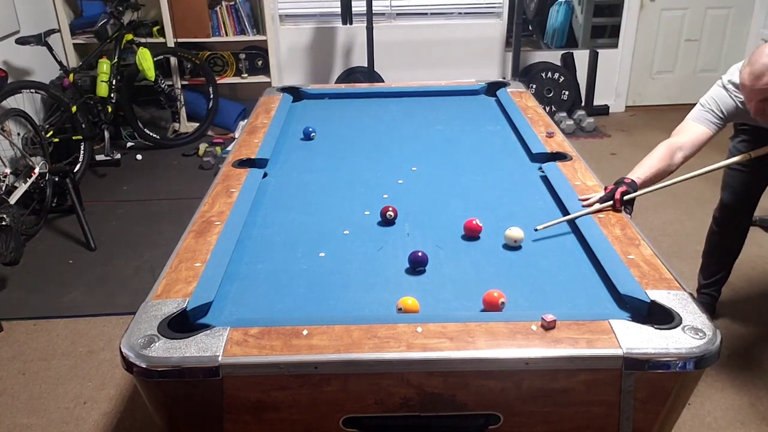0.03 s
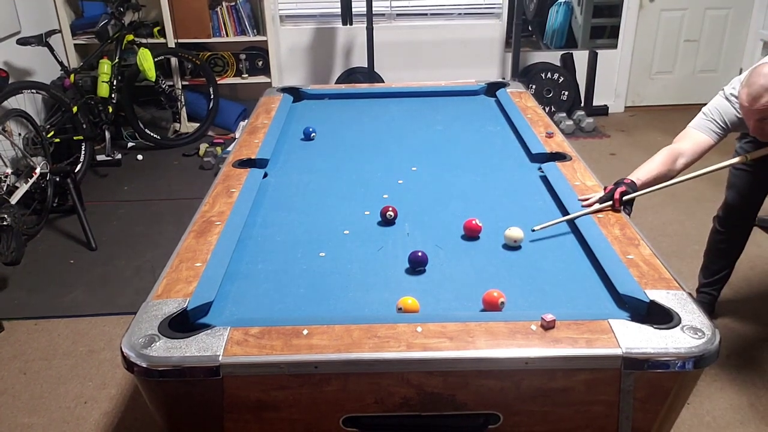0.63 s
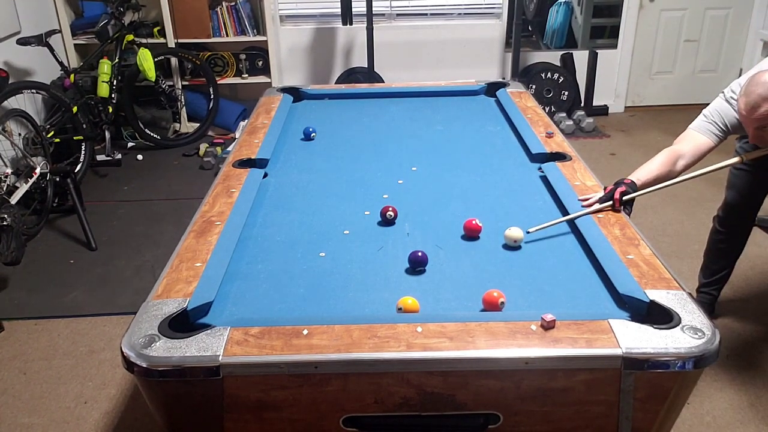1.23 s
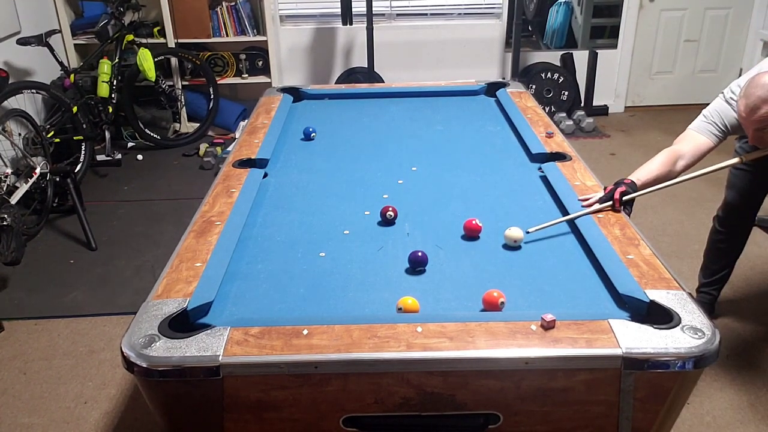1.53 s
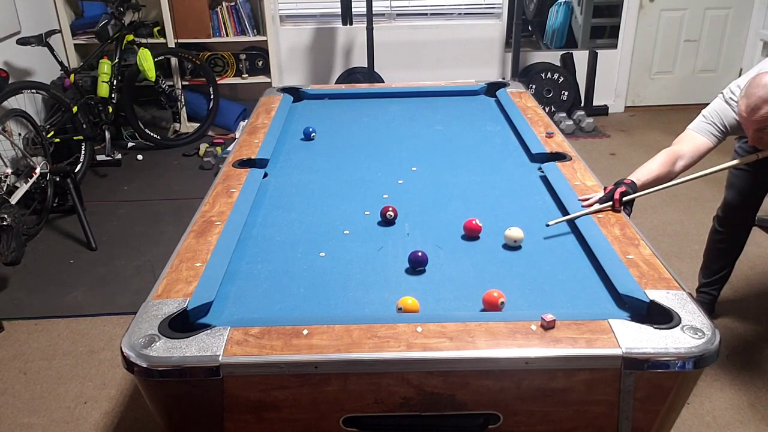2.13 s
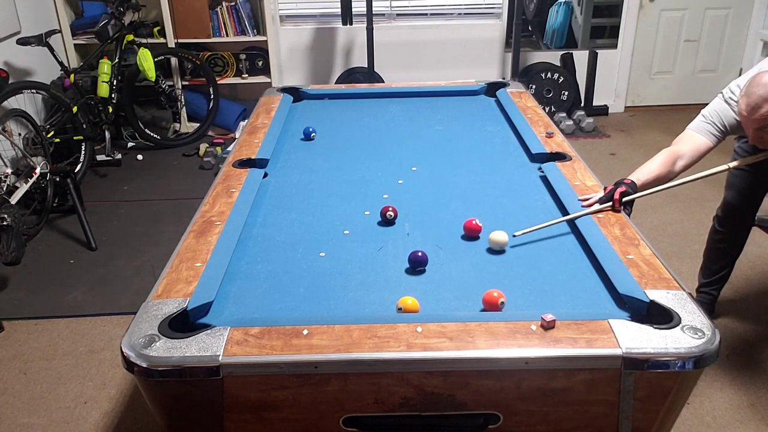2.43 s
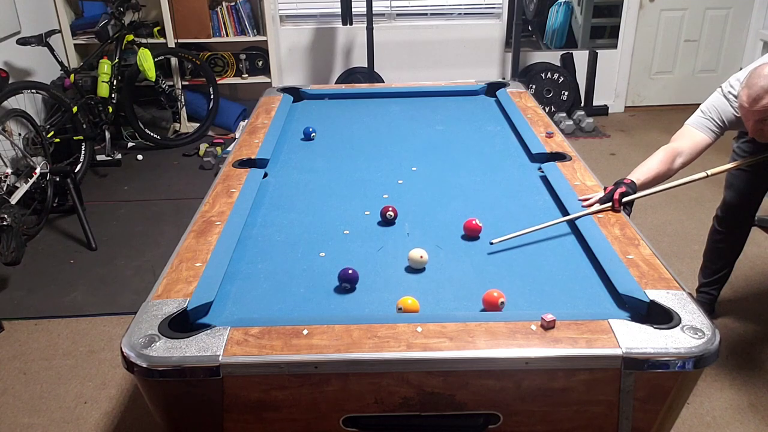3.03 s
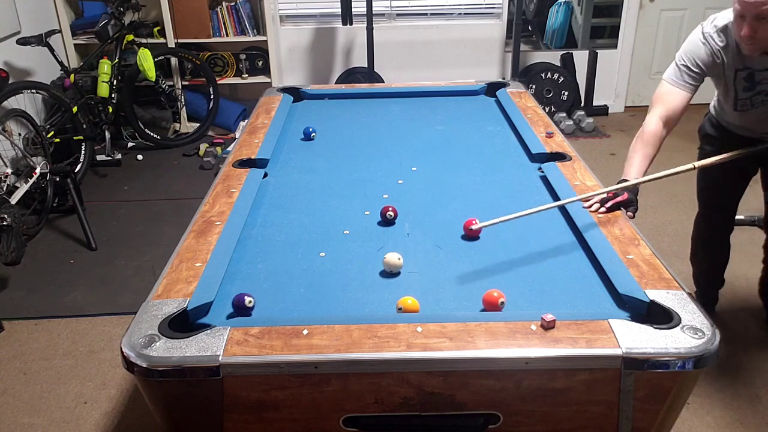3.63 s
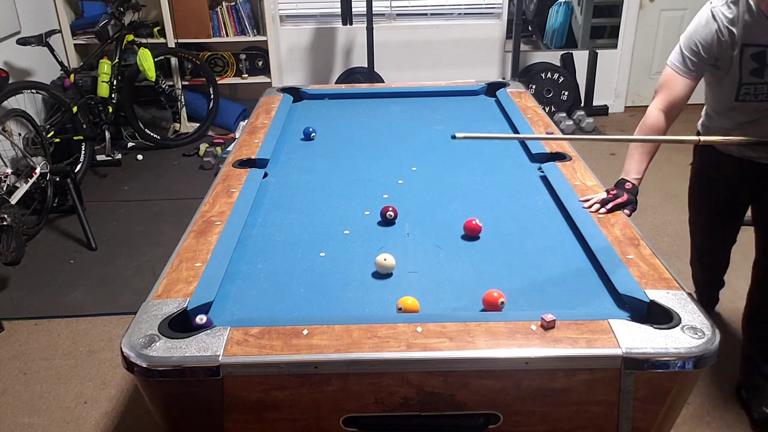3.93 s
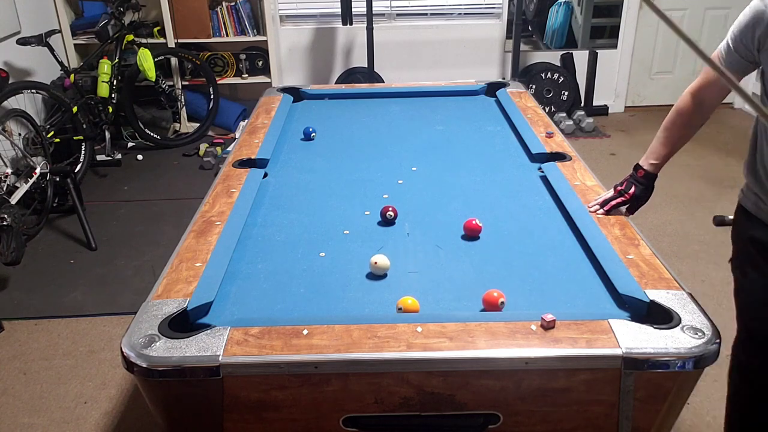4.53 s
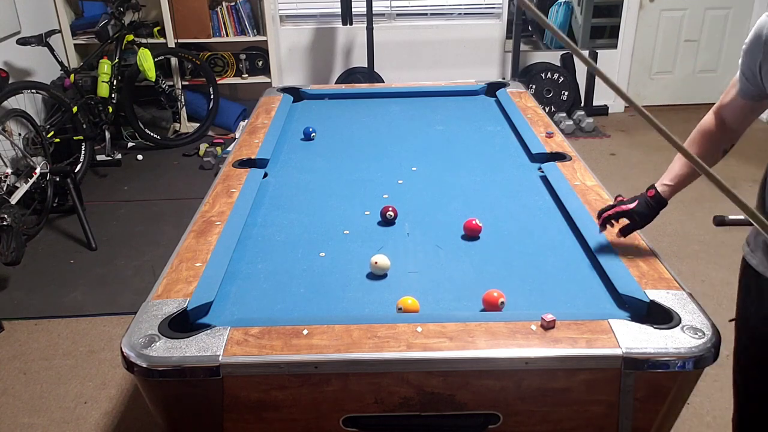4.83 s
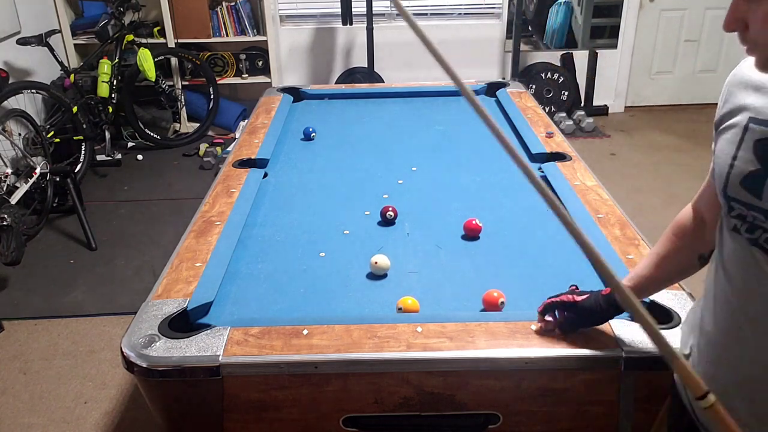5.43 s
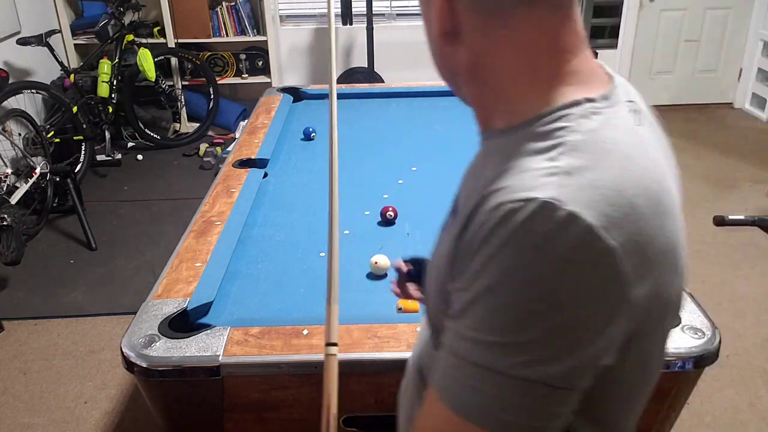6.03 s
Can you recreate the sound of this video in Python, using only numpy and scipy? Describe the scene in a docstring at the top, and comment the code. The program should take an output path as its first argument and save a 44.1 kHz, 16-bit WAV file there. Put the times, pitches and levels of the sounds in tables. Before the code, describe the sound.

Dull thumps, then a pool shot: balls click, roll, and one clatters into a pocket and trundles down a wooden channel.

```python
"""A pool shot in a hard-walled garage, over a faint hum and hiss. First, dull woody thumps boom out of
sight and a faint rumble follows. The cue taps the white ball, which clicks against another; the balls
rumble, hop and bump over the slate. One bumps the rubber jaw of a corner pocket and clatters in, ringing
the cabinet. A soft, airy hiss swells and sinks, the ball trundles down the wooden return channel, and a
fainter, thin rustle follows."""
import sys
import numpy as np
from scipy import signal
from scipy.fft import rfft, irfft, next_fast_len
from scipy.io import wavfile
from scipy.ndimage import map_coordinates

SR = 44100
rng = np.random.default_rng(int(sys.argv[2]) if len(sys.argv) > 2 else 0)


def master(y):
    """Save y as 16-bit WAV."""
    cut = np.clip(np.atleast_2d(y).T, -1, 1)
    pcm = np.round(cut * 32767)  # scale
    wavfile.write(sys.argv[1], SR, pcm.astype(np.int16))


N = 276948
T = np.arange(SR) / SR  # the one-second life of a blow

# colour of a ball rolling on slate, and of the far rumble: f/Hz, level/dB
ROLL_TONE = [(40, -29), (80, -5), (170, -8.5), (245, 0), (350, -9), (520, -18.5), (800, -33.5),
             (2000, -39.5), (6000, -85.5)]


def amp(db):
    """Decibels to gain."""
    return 10 ** (np.asarray(db) / 20)


def unit(x):
    """Scale to rms 1."""
    return x / np.sqrt(np.mean(x ** 2) + 1e-20)


def along(points, hz):
    """Read a curve of (f/Hz, value) points on a log frequency axis."""
    f, values = np.transpose(points)
    return np.interp(np.log(hz + 1), np.log(f + 1), values)


def wobble(rate):
    """A smooth random curve with `rate` knots a second."""
    knots = rng.standard_normal(int(N * rate / SR) + 4)
    return map_coordinates(knots, [np.arange(N) * rate / SR])


def envelope(start, length, rise_s, fall_db_per_s, fade_db_per_s=0):
    """A linear rise, a hold that may slowly fade, and a release."""
    t = np.maximum(np.arange(N) / SR - start, 0)
    return np.minimum(t / rise_s, 1) * amp(-fade_db_per_s * t - fall_db_per_s * np.maximum(t - length, 0))


def filtered(x, response):
    """Zero-phase EQ; `response` gives the gain at each frequency."""
    n = x.shape[-1]
    padded = next_fast_len(n + 8192)
    return irfft(rfft(x, padded) * response(np.fft.rfftfreq(padded, 1 / SR)), padded)[..., :n]


def add(track, s, db, sound):
    """Lay a blow on the track; db is its level with all its energy packed into 60 ms."""
    start = round(s * SR)
    part = sound[:, :N - start]
    track[:, start:start + part.shape[1]] += amp(db) * np.sqrt(.06) * part


def echoed(sound, echoes):
    """A sound, given as a function of time, plus its delayed copies."""
    return sound(T) + sum(amp(db) * sound(np.maximum(T - delay, 0)) for delay, db in echoes)


def diffuse(n, colour, wave_width_hz=5.4):
    """Stereo room noise shaped by standing waves: centred in the bass, wide in the treble."""
    # how alike left and right are: f/Hz, correlation
    likeness = [(60, 0.9), (250, 0.97), (500, 0.75), (1000, 0.031), (3000, 0.028), (12000, 0.014)]
    # peaks and nulls that all reflected sound shares: f/Hz, gain/dB
    standing_waves = [(149, -5), (166, 4.5), (226, 0.5), (274, -7.5), (295, 4), (349, 1.5), (373, -2),
                      (419, 4), (463, 2.5), (515, 1), (531, -0.5), (565, 5), (668, 5.5), (684, -6.5),
                      (733, 1), (1136, 2), (1184, -10.5)]
    grid = np.arange(1500)
    waves_db = sum(db * np.exp(-((grid - hz) / wave_width_hz) ** 2 / 2) for hz, db in standing_waves)

    def mid_side_gains(hz):
        spread = np.arccos(np.clip(along(likeness, hz), -1, 1)) / 2
        gain = colour(hz) * np.interp(hz, grid, amp(waves_db))
        return gain * np.array([np.cos(spread), np.sin(spread)])

    mid, side = filtered(rng.standard_normal((2, n)), mid_side_gains)
    return unit(np.array([mid + side, mid - side]))


def rush(tone):
    """Steady diffuse noise of a given colour."""
    return diffuse(N, lambda hz: amp(along(tone, hz)))


def impact(tone, bass_db=0, treble_db=0, wood_hz=1000, wood_db=0):
    """One contact pulse: heavy ones add bass, hard ones treble, and each spot has its own resonance."""
    hz = np.fft.rfftfreq(SR, 1 / SR)
    low_shelf = bass_db / (1 + (hz / 250) ** 4)
    high_shelf = treble_db * (1 - 1 / (1 + (hz / 1600) ** 3))
    resonance = wood_db / (1 + ((hz / wood_hz - 1) / 0.28) ** 2)
    db = along(tone, hz) + low_shelf + high_shelf + resonance
    # minimum phase packs the energy into the attack
    cepstrum = irfft(np.log(amp(db) + 1e-6), SR)
    fold = np.r_[1, np.full(SR // 2 - 1, 2), np.zeros(SR - SR // 2)]
    return unit(irfft(np.exp(rfft(cepstrum * fold)), SR))


def garage(x, direct_db, build_s, early_db=9.0):
    """A blow in the garage: strong early reflections, then a peaky tail that dies band by band."""
    # reverb time: f/Hz, t60/s
    decay = [(60, 1), (170, 0.97), (400, 0.78), (1000, 0.89), (2500, 0.85), (6000, 0.87), (9000, 0.62),
             (13000, .5)]
    # each spot favours its own midrange frequencies
    spacing_hz = 18
    heights = rng.standard_normal(SR // spacing_hz)
    depth_db = lambda hz: 2.6 * hz / (hz + 250) / (1 + (hz / 3200) ** 6)
    peaks = lambda hz: amp(depth_db(hz) * np.interp(hz / spacing_hz, np.arange(len(heights)), heights))
    hz, t, bands = signal.stft(diffuse(SR, peaks), SR, nperseg=256)
    dying = bands * amp(-60 * t / along(decay, hz)[:, None])
    tail = signal.istft(dying, SR, nperseg=256)[1][:, :SR]
    swell = (1 - np.exp(-T / build_s)) * amp(early_db * np.exp(-T / 0.055))
    wet = signal.fftconvolve(x[None], tail * swell, axes=1)[:, :SR]
    return unit(unit(wet) + amp(direct_db) * unit(x))


def knocks(hits, tone, direct_db, build_s, early_db, wood_db=0):
    """Short dead blows on one body, each ringing the room."""
    out = np.zeros((2, N))
    for s, db, *shading in hits:
        blow = impact(tone, *shading, wood_db=wood_db)
        add(out, s, db, garage(blow, direct_db, build_s, early_db))
    return out


def ringing(modes, attack_s):
    """Wooden modes (f/Hz, level/dB, t60/s) swell and die away, each at a random phase."""
    tones = sum(amp(db - 60 * T / t60) * np.sin(2 * np.pi * (hz * T + rng.random()))
                for hz, db, t60 in modes)
    return unit(tones * (1 - np.exp(-T / attack_s)))[None]


def room_tone(air_db=-56):
    """The bed: soft air noise and a faint hum that wavers."""
    # colour of the air: f/Hz, level/dB
    air_tone = [(25, -39.5), (40, -16), (60, 2.5), (160, -3.5), (250, -8), (400, -17), (630, -17.5),
                (1000, -18.5), (2200, -20), (2800, -28.5), (4000, -41), (7000, -45.5), (9000, -66.5),
                (11800, -43), (14500, -49)]
    # the hum: f/Hz, level/dB
    hum_tones = [(118.6, -49)]
    t = np.arange(N) / SR
    drift = .5 * wobble(4)
    waver = unit(amp(3 * wobble(11)))
    hum = sum(amp(db) * unit(np.sin(2 * np.pi * hz * t + drift)) for hz, db in hum_tones)
    return amp(air_db) * rush(air_tone) + hum * waver


def boom(hz=55.6, drift=0.04):
    """A deep, slightly wandering resonance swells and dies away under the thumps."""
    # its swells: t/s, length/s, level/dB
    swells = [(0.039, 0.028, -38.5), (0.269, 0.19, -34.5), (0.616, 0.2, -42.5), (0.99, 0.48, -46.5),
              (1.309, 0.36, -40.5)]
    phase = 2 * np.pi * np.cumsum(hz * (1 + drift * wobble(1.7))) / SR
    gain = sum(amp(db) * envelope(s, length, rise_s=0.037, fall_db_per_s=134) for s, length, db in swells)
    return gain * unit(np.sin(phase))


def thumps(t60_s=0.53, tilt_db_per_octave=-4.5):
    """Dull blows out of sight ring a wooden body; heavy ones ring its low modes most."""
    # the blows: t/s, level/dB, bass/dB, treble/dB, wood resonance/Hz, ring/dB
    hits = [(.069, -25, -9.5, 7, 764, -0.5), (.112, -21, -5.5, 11.5, 580, -6),
            (.126, -28.5, 15.5, 1, 172, 0), (.149, -24.5, 4, 14, 520, -5), (.184, -28, 21.5, -6, 191, -4),
            (.226, -25.5, -19, -0.5, 930, -8), (.243, -32.5, -14.5, -5, 1010, -8.5),
            (.266, -27, -19.5, -3, 525, -10), (.301, -29.5, -19, -0.5, 1000, -16.5),
            (.37, -32, -6.5, -0.5, 1010, -6), (.393, -34.5, -1, -4, 702, -6.5),
            (.452, -39.5, -12.5, -12, 582.6, -17), (.987, -36.5, -3.5, 12, 510, -5.5),
            (1.054, -31.5, 7.5, 11.5, 594, -5), (1.178, -35, -1.5, 1.5, 540, -8.5),
            (1.226, -35, 6, 8, 450, -17), (1.3132, -32, -16, 2.5, 650, -17.5),
            (1.362, -35.5, -5, 6, 800, -17), (1.601, -40.5, 10, 15, 417, -2.5)]
    # colour of a blow: f/Hz, level/dB
    tone = [(30, -41.5), (60, 0), (105, 0.5), (138, -2.5), (168, 7), (250, -0.5), (330, -2), (410, -6.5),
            (510, -9), (1250, -23), (1600, -30.5), (2700, -41), (3500, -50), (6800, -58.5), (8400, -81),
            (14000, -83.5)]
    # the body's modes before tilt and bass lift: f/Hz, level/dB
    wood_modes = [(118.4, -46.5), (166.9, -32.5), (209.9, -39), (323.0, -36), (354, -39), (419.9, -53.5),
                  (513, -32), (602.9, -46), (786, -47), (872.1, -56.5), (947, -36.5), (969, -43.5),
                  (1136, -41), (1184, -39.5), (1400, -62)]
    out = knocks([hit[:-1] for hit in hits], tone, direct_db=-11, build_s=0.0014, early_db=7, wood_db=7)
    for s, db, bass_db, _, _, ring_db in hits:
        modes = [(hz, mode_db + tilt_db_per_octave * np.log2(hz) + bass_db / (1 + (hz / 250) ** 4), t60_s)
                 for hz, mode_db in wood_modes]
        add(out, s, db + ring_db, ringing(modes, attack_s=0.012))
    return out


def clacks():
    """Hard clacks muffled by wood, among the thumps and later in the return channel."""
    # the clacks: t/s, level/dB
    hits = [(.069, -38.5), (.987, -45), (4.937, -54), (5.055, -47), (5.186, -38.5), (5.38, -52),
            (5.574, -54)]
    # their colour: f/Hz, level/dB
    tone = [(300, -15), (1000, 5.5), (1650, -2), (2100, 0.5), (2650, -2), (3300, -26), (4500, -34.5),
            (7000, -41), (9000, -64)]
    return knocks(hits, tone, direct_db=-20, build_s=0.00081, early_db=5.5)


def ticks(t60_s=.02):
    """Light contacts among the heavier knocks ring briefly in one band, blurred by nearby surfaces."""
    # the contacts: t/s, level/dB, centre/Hz, width/octaves, dry over room/dB
    hits = [(.074, -70.5, 12300, 0.26, -6.5), (.114, -29, 1060, 0.56, -4), (.146, -50.5, 4200, 0.48, -7),
            (0.989, -56, 2780, 0.14, -4), (1.017, -64.5, 4450, 0.31, -12), (1.178, -74, 4870, 0.5, -18),
            (1.314, -40.5, 703, 0.37, -11), (2.937, -39, 1080, 0.31, 1), (3.005, -39, 456, 0.15, 2.5),
            (2.939, -62.5, 4200, 0.72, -3.5), (3.864, -50.5, 2350, 0.5, 3),
            (4.136, -40.5, 2820, 0.73, -7.5), (4.164, -73, 11000, 0.36, -10), (4.229, -68, 11900, 0.41, -9),
            (4.238, -72, 11600, 0.29, -7), (5.186, -47.5, 1290, 1, 2), (5.572, -62.5, 3300, 0.69, -8)]
    out = np.zeros((2, N))
    for s, db, hz, octaves, direct_db in hits:
        pulse = impact([(hz * 2 ** (k * octaves), -12 * k * k) for k in range(-3, 4)])
        rattle = rng.standard_normal(SR) * amp(-60 * T / t60_s)
        tick = unit(signal.fftconvolve(pulse, rattle)[:SR])
        room = garage(pulse, direct_db=-18, build_s=0.0048)
        add(out, s, db, unit(amp(direct_db) * tick + room))
    return out


def rolling(rolls, tone, rise_s, lumpy_db):
    """A rumble, loudest as it sets off and fading as it slows; an uneven surface makes it lumpy."""
    gain = sum(amp(db) * envelope(s, length, rise_s, fall_db_per_s=93, fade_db_per_s=fade)
               for s, length, db, fade in rolls)
    return gain * unit(rush(tone) * amp(lumpy_db * wobble(25.13)))


def far_rumble():
    """A faint, smooth rumble starts out of sight just before the shot."""
    # the rumble: t/s, length/s, level/dB, fade/(dB/s)
    rolls = [(1.98, 1, -46, 3.3)]
    return rolling(rolls, ROLL_TONE, rise_s=0.12, lumpy_db=0)


def cue_tap():
    """The cue's leather tip taps the white ball."""
    # the tap: t/s, level/dB, bass/dB, treble/dB
    hits = [(2.508, -47, 3, 7)]
    # leather on ball: f/Hz, level/dB
    tone = [(100, 7), (350, 6.5), (750, 12.5), (1300, -6.5), (2700, -7.5), (4000, -17), (7000, -23.5),
            (9000, -53.5), (14000, -28)]
    return knocks(hits, tone, direct_db=-18.5, build_s=0.0025, early_db=3)


def ball_click(hz=2480, width_s=0.0003, direct_db=-6, snap_db=-23):
    """Two hard balls touch for an instant: a tiny wave packet with a glassy edge, echoes and room."""
    # the balls meet: t/s, level/dB
    hits = [(2.7897, -28.5)]
    # slap off the ceiling and near surfaces: delay/s, gain/dB
    echoes = [(.0011, -10), (.0033, -10), (.0067, -12), (.0089, 4), (.0103, -0.5)]
    # the glassy edge: f/Hz, level/dB
    snap_tone = [(1000, -44), (3500, 7.5), (4800, -17), (5900, -2.5), (9000, -42), (12000, -28), (14300, 4)]
    # the click as it feeds the room: f/Hz, level/dB
    send_tone = [(300, -34.5), (1000, -6), (1600, -3.5), (2250, 4), (2850, -1), (3400, -11), (3950, -12.5),
                 (4600, -38.5), (6500, -32.5), (8500, -68), (12500, -44.5), (15000, -41.5)]
    lead = 5 * width_s
    packet = unit(np.exp(-((T - lead) / width_s) ** 2 / 2) * np.cos(2 * np.pi * hz * (T - lead)))
    snap = amp(snap_db) * impact(snap_tone)
    contact = lambda t: np.interp(t, T, packet) + np.interp(t - lead + width_s, T, snap, left=0)
    pan_left, pan_right = amp([[3], [-3]]), amp([[-1.5], [1.5]])
    out = np.zeros((2, N))
    for s, db in hits:
        add(out, s - lead, db + direct_db, unit(echoed(contact, echoes)) * pan_left)
        add(out, s, db, garage(impact(send_tone), direct_db=-22, build_s=0.024) * pan_right)
    return out


def slate_roll():
    """The balls rumble over slate that is never quite even."""
    # the roll: t/s, length/s, level/dB, fade/(dB/s)
    rolls = [(2.81, 0.69, -30.5, 20)]
    return rolling(rolls, ROLL_TONE, rise_s=0.12, lumpy_db=1.5)


def hops():
    """The balls hop and land on the cloth-covered slate."""
    # the landings: t/s, level/dB, bass/dB, treble/dB
    hits = [(2.812, -24.5, 6, 10), (2.864, -31, -5, -11.5), (2.938, -44, -3, -4), (3.03, -36.5, 13.5, 1)]
    # slate under cloth: f/Hz, level/dB
    tone = [(40, -38), (90, -1.5), (200, -3.5), (330, 6), (500, -1.5), (700, 1), (900, -2), (1250, -11.5),
            (2000, -16), (6500, -52.5), (9000, -84)]
    return knocks(hits, tone, direct_db=-16, build_s=0.0015, early_db=5)


def bumps(attack_s=0.0028, note_db=-1):
    """Soft contacts on slate and rubber: a tick of first touch, a low ring, then the hollow cabinet."""
    # the contacts: t/s, level/dB, pitch/Hz, tick/dB, hollow after-ring/dB
    hits = [(2.864, -30, 339, -25, -14.5), (3.004, -29, 316, -21.5, -13), (3.143, -32, 308.5, -28, -18),
            (3.331, -49.5, 303, -39, -15), (3.354, -41, 298, -39, -20), (3.378, -34.5, 324, -26.5, -17.5),
            (3.711, -56.5, 352, -16, -1), (3.8646, -20.5, 342, -13, -6.5)]
    # the low ring: multiple of the pitch, level/dB, t60/s
    modes = [(.5, 3, 0.27), (1, 27, 0.059), (1.33, 0.5, .035), (1.62, 1, 0.019)]
    # flutter between the walls: delay/s, gain/dB
    flutter = [(0.0125, -13), (0.037, -15), (0.0729, -13), (.107, -27), (.145, -22)]
    # the hollow cabinet under the slate: f/Hz, level/dB
    cabinet_tone = [(100, -35.5), (220, -24), (310, 10), (400, 6), (490, 11), (620, -3.5), (900, -18.5),
                    (1500, -32), (4000, -69.5)]
    # its lasting note: f/Hz, level/dB, t60/s
    cabinet_modes = [(313, 5.5, 0.63), (361, -6.5, 0.41), (449, 1.5, 0.72), (475.6, 1, 0.61),
                     (526, -4, 0.52)]
    # the first touch: f/Hz, level/dB
    tick_tone = [(30, -33), (70, 6.5), (200, 3), (600, 4), (950, 1), (1500, -4.5), (2400, -3), (3500, -14),
                 (6500, -24), (8500, -48.5), (13000, -44)]
    out = np.zeros((2, N))
    for s, db, hz, tick_db, hollow_db in hits:
        ring = lambda t: (1 - np.exp(-t / attack_s)) * sum(
            amp(mode_db - 60 * t / t60) * np.sin(2 * np.pi * hz * k * t) for k, mode_db, t60 in modes)
        add(out, s, db, unit(echoed(ring, flutter))[None])
        add(out, s, db + hollow_db, garage(impact(cabinet_tone), direct_db=-39.5, build_s=0.022))
        add(out, s, db + hollow_db + note_db, ringing(cabinet_modes, attack_s=0.007))
        add(out, s - .001, db + tick_db, garage(impact(tick_tone), direct_db=-16, build_s=0.00033))
    return out


def pocket_drop(ring_db=-7):
    """The ball clatters into the pocket; every knock rings the cabinet."""
    # it falls and settles: t/s, level/dB, bass/dB, treble/dB, wood resonance/Hz
    hits = [(4.136, -27.5, -20, 10, 2450), (4.174, -24.5, 3, 16, 970), (4.238, -29, 0.5, 14, 4840),
            (4.31, -39.5, -17.5, 10, 1330)]
    # colour of the pocket: f/Hz, level/dB
    tone = [(21, -70), (35, -22), (54, 4), (117, 1.5), (221, -7), (507, -12), (686, -23), (759, -21),
            (818, -19.5), (1160, -26.5), (3720, -47), (7340, -61), (8540, -81), (12500, -80), (14500, -86)]
    # the cabinet's ring: f/Hz, level/dB, t60/s
    modes = [(115.9, 1, 0.61), (186, -7, 0.52), (361, -13, 0.5), (458, -20, .7), (480, -12, 0.29),
             (755, -6, 0.3), (935, -18, 0.59), (1100, -19, 0.48)]
    out = knocks(hits, tone, direct_db=-13, build_s=0.00013, early_db=5.5, wood_db=6)
    for s, db, *_ in hits:
        add(out, s, db + ring_db, ringing(modes, attack_s=0.0068))
    return out


def soft_hisses(grain_db=0.5):
    """A soft, airy hiss swells and sinks; a fainter, thin rustle follows."""
    # the swells: peak t/s, half length/s, level/dB, bright band centre/Hz, width/Hz, boost/dB
    swells = [(4.695, 0.071, -63.5, 11030, 2440, 0), (5.875, 0.13, -74, 10750, 506, 11.5)]
    # colour of the hiss: f/Hz, level/dB
    tone = [(800, -9.5), (2800, 3), (3500, 0.5), (7200, -4.5), (8400, -24), (10600, -12), (12400, -9.5),
            (15000, -23)]
    t = np.arange(N) / SR
    out = np.zeros((2, N))
    for s, half_s, db, centre_hz, width_hz, boost_db in swells:
        bright_band = lambda hz: boost_db / (1 + ((hz - centre_hz) / width_hz) ** 2)
        hiss = diffuse(N, lambda hz: amp(along(tone, hz) + bright_band(hz)))
        swell = (1 + ((t - s) / half_s) ** 2) ** -0.72
        out += amp(db + grain_db * wobble(90)) * hiss * swell
    return out


def return_channel():
    """The potted ball knocks and trundles down the wooden channel."""
    # the knocks: t/s, level/dB, bass/dB, treble/dB, wood resonance/Hz
    hits = [(4.95, -59, -2, -4, 900), (4.998, -54, 7, -12, 387), (5.056, -42, -9, -13, 890),
            (5.122, -61, -10.5, 6, 650), (5.187, -28.5, 1.5, 6.5, 820), (5.33, -35.5, 5.5, -12, 318),
            (5.395, -41.5, 5, -12, 734)]
    # the channel when struck: f/Hz, level/dB
    knock_tone = [(29, -39), (50, -2.5), (109, 6), (226, -1.5), (330, 2), (470, 1.5), (541, -6.5),
                  (653, -5.5), (900, -9), (1460, -16), (2690, -26), (4730, -37.5), (7410, -60.5),
                  (8140, -114), (14000, -93)]
    # the roll: t/s, length/s, level/dB, fade/(dB/s)
    rolls = [(4.94, 1.4, -41, 0.63)]
    # the channel when rolled on: f/Hz, level/dB
    rumble_tone = [(29, -54), (50, -11), (66, -4.5), (91, -14), (118, 1), (264, -17.5), (303, -4.5),
                   (356, -9), (394, -16), (649, -18.5), (704, -21), (1210, -32), (2030, -40.5),
                   (6000, -61.5), (7800, -71), (13200, -120)]
    knocking = knocks(hits, knock_tone, direct_db=-19.5, build_s=0.0026, early_db=0.5, wood_db=8)
    return knocking + rolling(rolls, rumble_tone, rise_s=0.008, lumpy_db=0.6)


def scene():
    """Mix all sources, leaning to the left except in the very top."""
    # stereo balance: f/Hz, left over right/dB
    balance = [(50, 2.5), (200, 4.5), (600, 4), (2000, 9.5), (5000, 8), (8000, 16.5), (14000, -9.5)]
    unseen = thumps() + boom() + far_rumble()
    shot = cue_tap() + ball_click()
    table = hops() + bumps() + slate_roll()
    woodwork = return_channel() + clacks() + pocket_drop()
    mix = unseen + shot + table + woodwork + ticks() + soft_hisses() + room_tone()
    return filtered(mix, lambda hz: amp(np.outer([.5, -.5], along(balance, hz))))


def record(dry):
    """A steep high cut takes off the topmost air."""
    cutoff_hz = 14700
    return filtered(dry, lambda hz: 1 / (1 + (hz / cutoff_hz) ** 120))


dry = scene()
out = record(dry)
master(out)
```